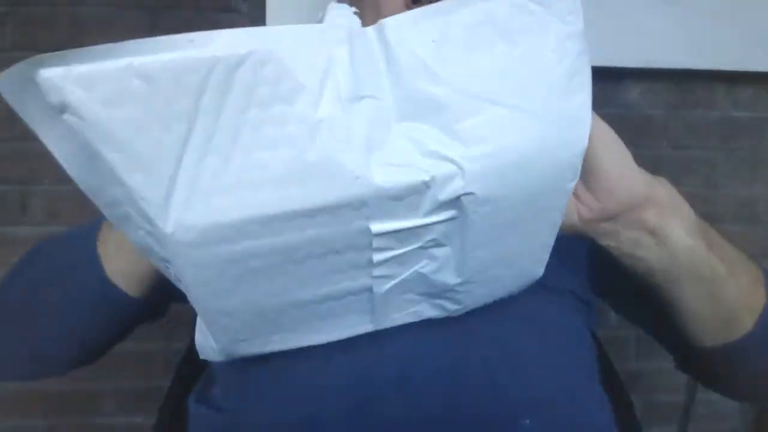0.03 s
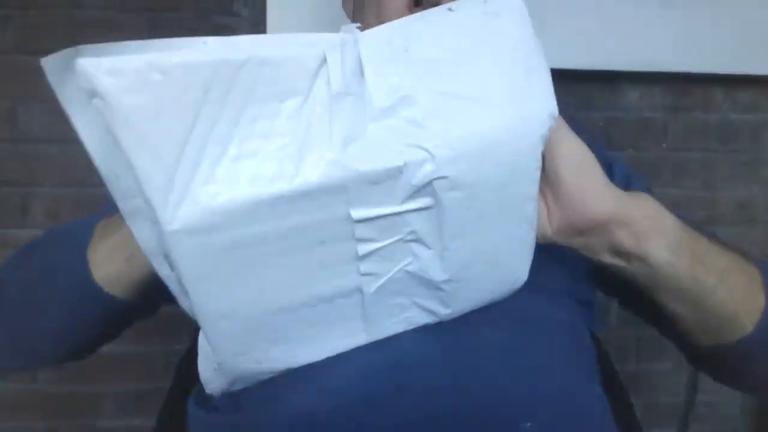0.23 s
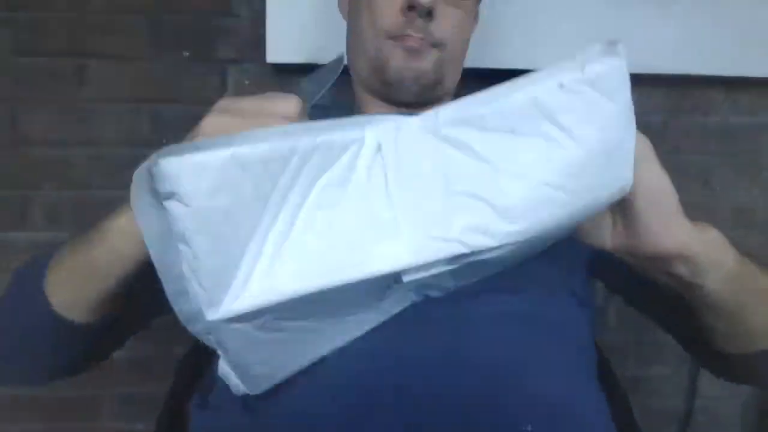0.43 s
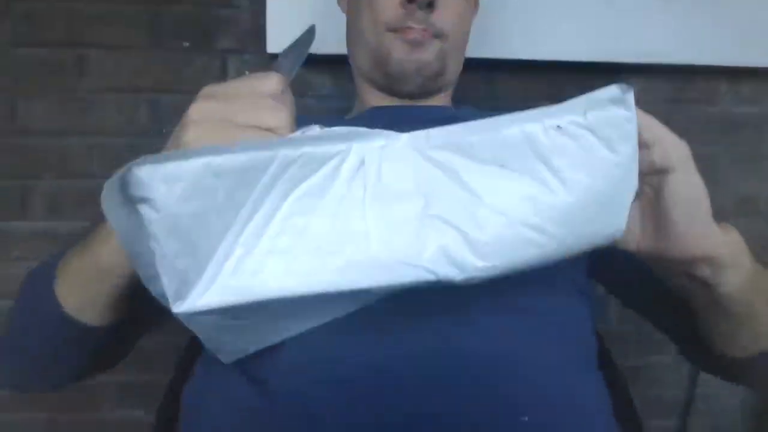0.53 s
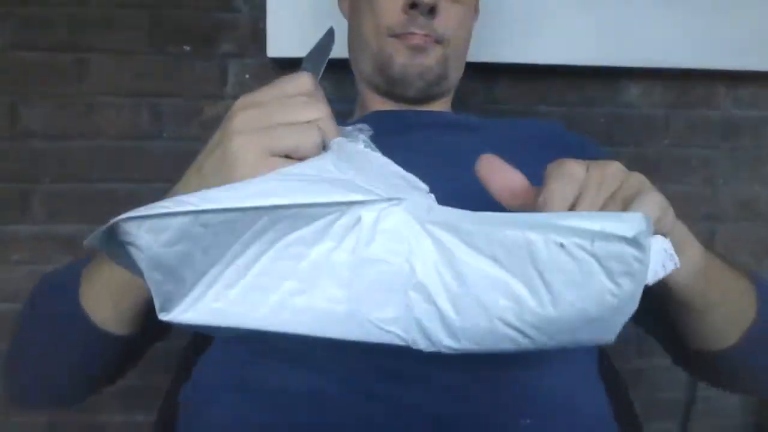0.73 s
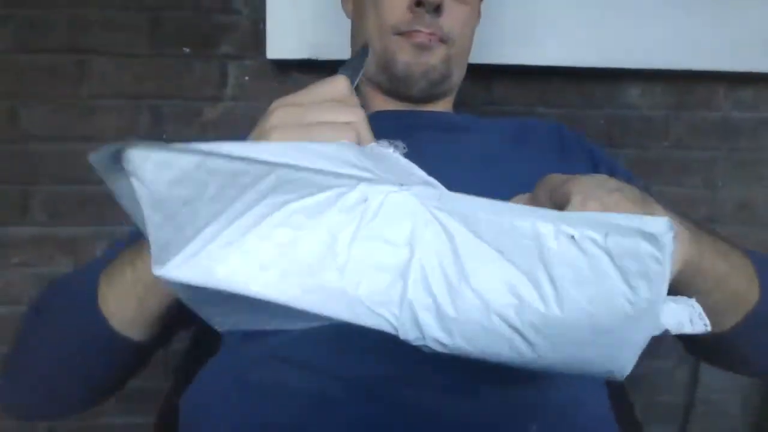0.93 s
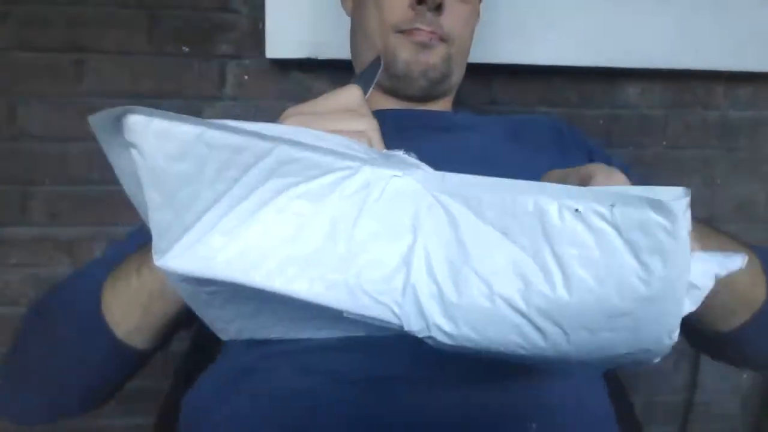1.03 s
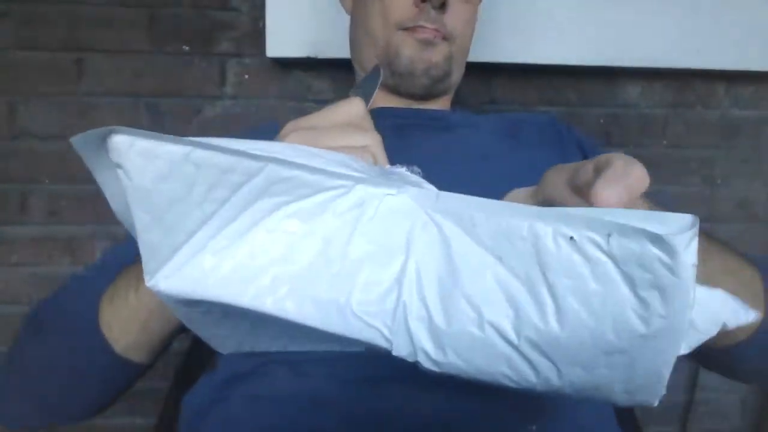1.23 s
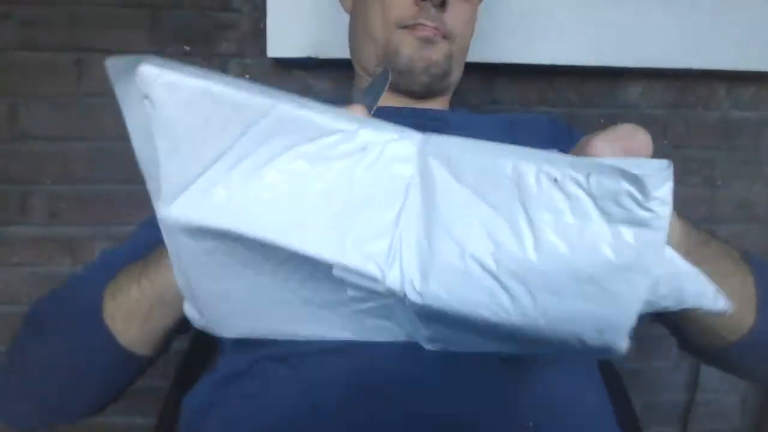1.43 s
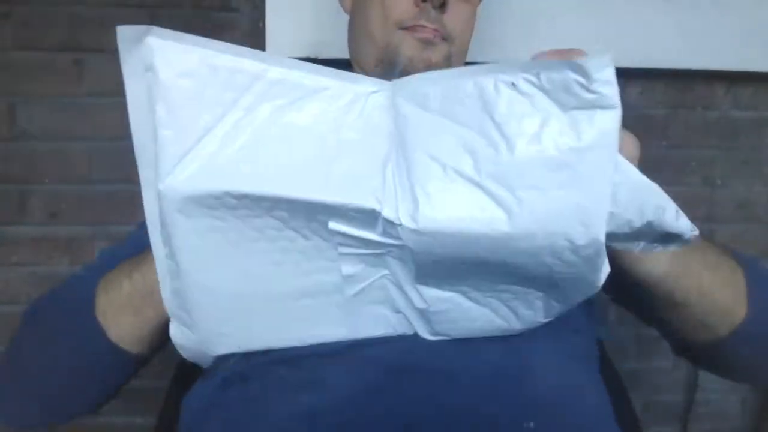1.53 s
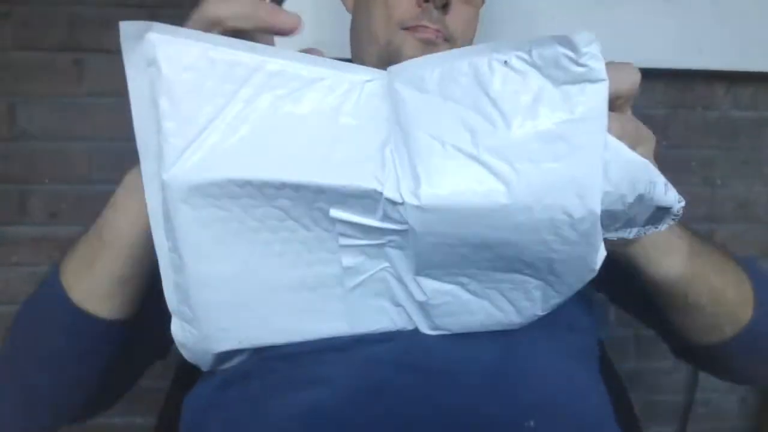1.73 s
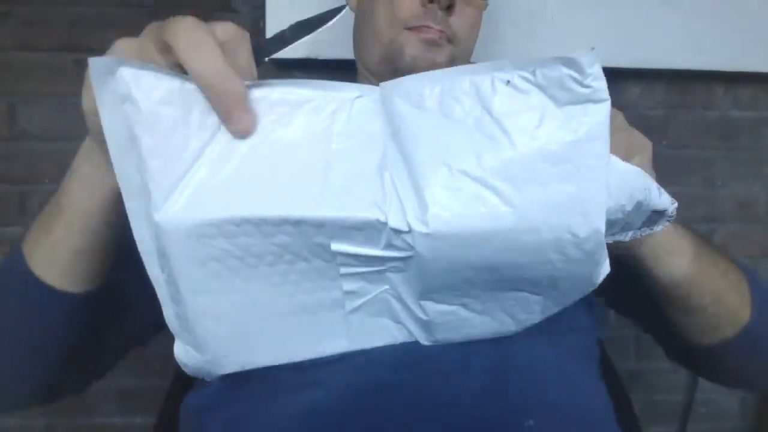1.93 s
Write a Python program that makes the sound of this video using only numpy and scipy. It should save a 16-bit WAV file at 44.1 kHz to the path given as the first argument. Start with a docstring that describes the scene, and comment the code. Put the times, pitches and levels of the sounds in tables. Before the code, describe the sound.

Stiff plastic packaging rustles and snaps as hands turn and tug it; a big early crunch, lighter crinkling, two further crunches, then almost silence and small squeaky slides, heard close and slightly dull indoors.

```python
"""Creases snap over a fine plastic crinkle: a padded mailer is gripped, turned and pulled at, close to a
narrow-band microphone in a small room. Three hard tugs crush many folds at once and the panels buckle
with hollow pops; the room hums briefly after each.
Crinkle, rustle and slides are shaped random clicks; snaps are noise bursts plus film rings; pops and
low hums are enveloped sines. A diffuse tail with room modes and faint air noise surround them."""
import sys
import numpy as np
from scipy import signal
from scipy.io import wavfile
from scipy.ndimage import uniform_filter1d

SR = 44100
rng = np.random.default_rng(int(sys.argv[2]) if len(sys.argv) > 2 else 0)


def digitize_waveform(pressure):
    """Quantize a signal to 16-bit integers and store it at the path in sys.argv[1].

    Rows of a 2-D input are taken as channels; values are limited to [-1, 1].
    """
    field = np.atleast_2d(pressure).T
    bounded = np.clip(field, -1, 1)
    quanta = np.round(bounded * 32767).astype(np.int16)
    wavfile.write(sys.argv[1], SR, quanta)


N = 88200


def amp(db):
    """Decibels to gain."""
    return 10 ** (np.asarray(db) / 20)


def unit(x):
    """Scales to rms 1."""
    return x / np.sqrt(np.mean(x ** 2) + 1e-20)


def read(points, hz):
    """Reads a spectrum on a log-frequency axis."""
    f, value = np.transpose(points)
    return np.interp(np.log(hz + 1), np.log(f + 1), value)


def level(table, order):
    """Gain over time from one dB column of a curve."""
    rows = np.array(table, float)
    return amp(np.interp(np.arange(N) / SR, rows[:, 0], rows[:, order]))


def add(mix, start_s, sound):
    """Mixes a sound in at a time."""
    part = mix[max(round(start_s * SR), 0):][:len(sound)]
    part += sound[:len(part)]


def arch(start_s, length_s, fullness):
    """Gain that swells and fades once; lower fullness is flatter on top."""
    u = np.clip((np.arange(N) / SR - start_s) / length_s, 0, 1)
    return (4 * u * (1 - u)) ** fullness


def colour(x, points):
    """Causal minimum-phase filter with the given spectrum."""
    hz = abs(np.fft.fftfreq(4096, 1 / SR))
    log_gain = np.log(amp(read(points, hz)))
    spectrum = np.exp(np.conj(signal.hilbert(log_gain)))
    taps = np.fft.ifft(spectrum).real
    return signal.fftconvolve(x, taps[:len(taps) // 2])[:len(x)]


def clicks(per_s, spread_db):
    """Random clicks of either sign, mostly small and a few large."""
    size = amp(spread_db * np.minimum(rng.exponential(1, N), 3.5))
    sign = rng.choice([-1., 1.], N)
    return size * sign * (rng.random(N) < per_s / SR)


def steadied(x, window_s):
    """Evens out slow chance swells and keeps the grain."""
    power = uniform_filter1d(x ** 2, max(int(window_s * SR), 8))
    power = uniform_filter1d(power, max(int(window_s * SR / 2), 8))
    return x / np.sqrt(abs(power) + 1e-3 * np.mean(x ** 2))


def peaked(x):
    """Scales a short burst so that its loudest 1.5 ms has rms 1."""
    power = uniform_filter1d(x ** 2, 66, mode="constant")
    return x / np.sqrt(power.max() + 1e-20)


def patchy(x, patch_db, frames=9, bins=7):
    """The colour shifts at random as the folding moves from one part of the sheet to another."""
    z = signal.stft(x, nperseg=512, noverlap=384)[2].T
    field = rng.standard_normal(z.shape)
    field = uniform_filter1d(uniform_filter1d(field, frames, 0), bins, 1)
    z = z * amp(patch_db * unit(field))
    return signal.istft(z.T, nperseg=512, noverlap=384)[1][:N]


# room noise spectrum: (frequency [Hz], relative level [dB])
AIR_SPECTRUM = [(20, -22), (70, -5), (200, 2), (290, -2), (450, -10.5), (1000, -18), (3000, -30.5),
                (7000, -41)]


def air(rms_db=-64):
    """Faint low room noise: coloured Gaussian noise."""
    return amp(rms_db) * unit(colour(rng.standard_normal(N), AIR_SPECTRUM))


# room hums as the mailer is shifted: (start [s], length [s], pitch [Hz], peak before waver [dB])
ROOM_HUMS = [(0.453, 0.16, 205, -51.5), (0.577, 0.13, 205, -53.5), (.85, 0.093, 205, -50),
             (0.96, 0.17, 207, -50), (1.57, 0.081, 200, -46.5), (1.825, 0.096, 272.6, -51.5)]


def hums(waver_rms=.35, waver_hz=25):
    """The room hums low as the mailer shifts: arched sines, unsteady in level and phase."""
    out = np.zeros(N)
    low_pass = signal.butter(2, waver_hz, fs=SR)
    drift = waver_rms * unit(signal.lfilter(*low_pass, rng.standard_normal((2, N))))
    for start_s, length_s, hz, db in ROOM_HUMS:
        first = max(round(start_s * SR), 0)
        swell, phase = drift[:, first:][:, :round(length_s * SR)]
        t = np.arange(len(swell)) / SR
        envelope = np.sin(np.pi * t / length_s) * (1 + swell)
        add(out, start_s, amp(db) * envelope * np.sin(2 * np.pi * hz * t + phase))
    return out


# finger slides: (start [s], length [s], start pitch [Hz], end pitch [Hz], level [dB])
FINGER_SLIDES = [(0.035, 0.078, 1000, 1020, -38.5), (0.44, 0.14, 1050, 950, -39),
                 (0.46, 0.0032, 4200, 4200, -26), (0.684, 0.031, 1900, 1820, -30.5),
                 (0.722, 0.018, 800, 760, -38), (0.763, 0.093, 1520, 1500, -41.5),
                 (1.215, 0.058, 1000, 1100, -34.5), (1.314, 0.063, 399, 554, -41.5),
                 (1.434, 0.034, 780, 430, -35.5), (1.722, 0.078, 4220, 4220, -60.5),
                 (1.894, 0.052, 1180, 1120, -41), (1.915, 0.096, 1020, 1060, -31.5)]


def slides(per_s=900, spread_db=2, even_s=0.023, pole_width_at_1k_hz=250, fullness=0.5):
    """Rubbed film sticks and slips, ringing one narrow note that glides as the film stretches."""
    out, slips = np.zeros(N), clicks(per_s, spread_db)
    for start_s, length_s, start_hz, end_hz, db in FINGER_SLIDES:
        hz = np.interp(np.arange(N) / SR, [start_s, start_s + length_s], [start_hz, end_hz])
        carrier = np.exp(2j * np.pi * np.cumsum(hz) / SR)
        width_hz = pole_width_at_1k_hz * np.sqrt(start_hz / 1000)
        pole = np.exp(-np.pi * width_hz / SR)
        # shift the note to 0 Hz, resonate, shift back
        note = (carrier * signal.lfilter([1], np.poly([pole, pole]), slips / carrier)).real
        out += amp(db) * arch(start_s, length_s, fullness) * steadied(note, even_s)
    return out


# hand thuds: (start [s], length [s], level [dB])
HAND_THUDS = [(0.109, 0.075, -54), (0.302, 0.034, -30.5), (0.364, 0.057, -34), (1.056, 0.023, -43),
              (1.178, 0.044, -51), (1.466, 0.047, -34)]
# thud spectrum: (frequency [Hz], relative level [dB])
THUD_SPECTRUM = [(25, -33.5), (70, -11.5), (130, 3), (200, 2), (350, -12.5), (900, -44.5)]


def thuds(per_s=900, spread_db=2, even_s=.03):
    """The hands press into the padding with a dull bump: arched, low-coloured clicks."""
    force = np.zeros(N)
    push = steadied(colour(clicks(per_s, spread_db), THUD_SPECTRUM), even_s)
    for start_s, length_s, db in HAND_THUDS:
        t = np.arange(0, length_s, 1 / SR)
        add(force, start_s, amp(db) * np.sin(np.pi * t / length_s))
    return force * push


# padding flex: (time [s], level before trim [dB])
FLEX_LEVEL = [(0, -77), (.10, -60.5), (.15, -74), (.20, -65.5), (.274, -39), (.299, -45), (.305, -10),
              (.314, -17.5), (.345, -22.5), (.40, -28.5), (.425, -39.5), (.44, -53.5), (.68, -63.5),
              (.715, -46.5), (.76, -66), (1.0, -64.5), (1.045, -49.5), (1.065, -21.5), (1.10, -36.5),
              (1.14, -48), (1.172, -69), (1.185, -36.5), (1.22, -32), (1.27, -57.5), (1.31, -49.5),
              (1.33, -39.5), (1.40, -63.5), (1.44, -67), (1.474, -34), (1.49, -18), (1.535, -40),
              (1.56, -59.5), (1.75, -75), (2, -67.5)]
# flex spectrum: (frequency [Hz], relative level [dB])
FLEX_SPECTRUM = [(30, -41), (70, -24.5), (130, -10.5), (250, -1), (450, 4.5), (650, 0), (1000, -3.5),
                 (2000, -45)]


def flex(per_s=700, spread_db=4, trim_db=-2, even_s=0.092):
    """The padding crumples with a dull rustle when it is tugged."""
    rustle = steadied(colour(clicks(per_s, spread_db), FLEX_SPECTRUM), even_s)
    return amp(trim_db) * level(FLEX_LEVEL, order=1) * rustle


# handling effort: (time [s], crinkle level before trim [dB], ringing-fold level before trim [dB])
EFFORT = [(0, -36, -35.5), (0.05, -40, -35.5), (0.085, -35, -31), (0.105, -49, -40.5),
          (0.135, -37.5, -42.5), (0.18, -31, -29.5), (0.235, -27, -24.5), (0.27, -26.5, -25),
          (0.298, -29.5, -25), (0.31, -29, -9.5), (0.34, -28.5, -19), (0.385, -20.5, -15.5),
          (0.415, -28.5, -28.5), (0.445, -38, -31.5), (0.495, -29.5, -30), (0.52, -43.5, -30.5),
          (0.55, -27, -30.5), (0.605, -41, -45), (0.64, -30, -28.5), (0.68, -37, -33), (0.71, -30.5, -25.5),
          (0.76, -44, -64), (0.825, -34, -35.5), (0.86, -50, -41.5), (0.905, -34.5, -35), (0.93, -55, -82),
          (0.985, -45.5, -81), (1.015, -28, -52), (1.042, -37.5, -35.5), (1.065, -30, -20.5),
          (1.095, -37.5, -42.5), (1.16, -37, -42), (1.215, -30.5, -22.5), (1.27, -36.5, -50),
          (1.33, -36.5, -39.5), (1.405, -34.5, -34), (1.45, -33.5, -30), (1.473, -38.5, -25),
          (1.49, -24, -20.5), (1.525, -35, -22), (1.56, -72, -60), (1.61, -39.5, -43), (1.63, -45, -33),
          (1.675, -56, -96), (1.71, -80.5, -101), (1.82, -54.5, -63.5), (1.88, -80, -81), (1.895, -41, -39),
          (1.918, -61, -48), (1.93, -54.5, -40), (1.975, -41, -30), (2.0, -46, -33)]
# crinkle spectrum: (frequency [Hz], relative level [dB])
CRINKLE_SPECTRUM = [(300, -49.5), (600, -36.5), (1200, -15.5), (1950, 3.5), (2500, 7.5), (3100, 4.5),
                    (4000, 6), (5100, -2.5), (6200, -3), (7500, -6)]


def crinkle(per_s=1600, pitched_per_s=70, spread_db=2.0, trim_db=-2, even_s=0.047, patch_db=3,
            pitch_count=12, decay_cycles=2):
    """Tiny folds give way in a dense, bright crackle: plain clicks plus short pitched rings."""
    t, pitched = np.arange(400) / SR, np.zeros(N)
    for hz in np.geomspace(1500, 6600, pitch_count):
        ring = np.sin(2 * np.pi * hz * t) * np.exp(-t * hz / decay_cycles)
        pitched += signal.oaconvolve(clicks(pitched_per_s, spread_db), ring)[:N] * hz
    grain = patchy(unit(clicks(per_s, spread_db)) + unit(pitched), patch_db)
    crackle = steadied(colour(grain, CRINKLE_SPECTRUM), even_s)
    return amp(trim_db) * level(EFFORT, order=1) * crackle


# fold spectrum: (frequency [Hz], relative level [dB])
FOLD_SPECTRUM = [(300, -36), (560, -32.5), (680, -6), (800, 3), (1000, 5.5), (1300, 3.5), (1700, 3.5),
                 (2200, 7.5), (3200, -21.5)]


def folds(per_s=1000, spread_db=3.0, low_hz=780, high_hz=1900, decay_cycles=1.6, trim_db=-4.0,
          even_s=0.019, pitch_count=14):
    """Larger folds each ring a patch of film: random clicks excite short damped sines."""
    t, out = np.arange(1000) / SR, np.zeros(N)
    for hz in np.geomspace(low_hz, high_hz, pitch_count):
        ring = np.sin(2 * np.pi * hz * t) * np.exp(-t * hz / decay_cycles)
        hits = clicks(per_s / pitch_count, spread_db)
        out += signal.oaconvolve(hits, ring)[:N] * np.sqrt(hz / low_hz)
    return amp(trim_db) * level(EFFORT, order=2) * steadied(colour(out, FOLD_SPECTRUM), even_s)


# tugs crushing many folds: (start [s], length [s], level [dB])
CRUSH_TUGS = [(0.304, 0.029, -22), (0.332, 0.093, -26), (1.046, 0.048, -26), (1.471, 0.065, -26)]
# crush spectrum: (frequency [Hz], relative level [dB])
CRUSH_SPECTRUM = [(300, -35), (600, -4), (1100, 5.5), (3900, 2.5), (5000, -10.5), (7500, -9.5)]


def crushes(per_s=5000, spread_db=3.0, even_s=0.011, fullness=0.53):
    """A hard tug packs many tiny crackles into one burst."""
    force = sum(amp(db) * arch(start_s, length_s, fullness) for start_s, length_s, db in CRUSH_TUGS)
    return force * steadied(colour(clicks(per_s, spread_db), CRUSH_SPECTRUM), even_s)


# crease snaps: (time [s], ring pitch [Hz], ring before trim and filter [dB], crack [dB], tick [dB])
CREASE_SNAPS = [(0.024, 990, -28.5, -34.5, -44), (0.032, 1000, -25.5, -27.5, -40),
                (0.0569, 995, -30.5, -28.5, -58), (0.0735, 990, -26, -36, -35),
                (0.0827, 1050, -25.5, -31.5, -46), (0.1475, 1970, -28.5, -31, -28.5),
                (0.178, 1616, -23.5, -46, -34), (0.1862, 1910, -18.5, -27, -22.5),
                (0.2019, 770, -24, -37, -30), (0.2245, 1190, -18.5, -20.5, -48),
                (0.235, 980, -27, -32, -41.5), (0.262, 1770, -12.5, -22, -38), (0.2752, 710, -16, -18, -20),
                (0.2879, 740, -14, -17.5, -30), (0.3057, 1036, -9.5, -17, -39),
                (0.3106, 720, -24, -19, -32.5), (0.3231, 1090, -18, -19.5, -39),
                (0.3281, 1830, -9.5, -10, -57), (0.3507, 1800, -9, -29, -44),
                (0.3622, 1200, -16.5, -22, -43.5), (0.3827, 1150, -14.5, -12.5, -37),
                (0.3965, 730, -28, -20.5, -22.5), (0.4619, 1210, -27, -24, -49),
                (0.4891, 1930, -17.5, -22, -27.5), (0.4987, 1000, -27.5, -18, -34),
                (0.504, 960, -25, -33, -39), (0.5277, 970, -29, -21.5, -24),
                (0.5405, 1840, -19.5, -26.5, -38), (0.5682, 1030, -30, -24.5, -22.5),
                (0.628, 1540, -21.5, -47.5, -47), (0.6444, 1030, -43, -32, -42.5),
                (0.6629, 915, -24, -24.5, -36), (0.7018, 1860, -14, -30.5, -41),
                (0.7103, 1580, -20, -37, -33), (0.744, 1200, -34, -34, -34.5),
                (0.8006, 1410, -39, -38, -47), (0.8234, 1570, -58, -24, -47), (0.8272, 1440, -25, -39, -39),
                (0.915, 960, -40.5, -33.5, -35.5), (0.9966, 1330, -57, -34.5, -31.5),
                (1.0111, 1400, -57, -26, -27), (1.0174, 1540, -26.5, -35.5, -38),
                (1.034, 1640, -42.5, -26, -27.5), (1.0521, 910, -18, -26.5, -34.5),
                (1.0664, 770, -21, -18, -33), (1.0706, 863, -12, -35, -19.5),
                (1.0877, 960, -37.5, -35, -29), (1.1077, 1340, -23.5, -39, -29.5),
                (1.1279, 1360, -27, -38.5, -43), (1.1796, 1150, -31, -26.5, -30.5),
                (1.2005, 1195, -25.5, -27.5, -33), (1.2109, 833, -20.5, -22.5, -27),
                (1.2216, 980, -19.5, -33.5, -32), (1.2349, 1090, -22, -29.5, -26.5),
                (1.2403, 1120, -29, -33, -38), (1.278, 1190, -30.5, -29, -30),
                (1.288, 1280, -54, -42.5, -22.5), (1.3044, 1463, -29, -26, -16.5),
                (1.322, 858, -16.5, -13.5, -20), (1.3307, 1395, -22, -29, -27),
                (1.3418, 1180, -19, -31, -22.5), (1.3677, 890, -27.5, -22, -25),
                (1.3801, 1100, -23.5, -26.5, -27), (1.3931, 1280, -27, -39.5, -31.5),
                (1.4182, 1067, -29, -27, -33), (1.4285, 833, -22, -20, -29),
                (1.4471, 772, -19.5, -21.5, -37), (1.4502, 1950, -18.5, -31, -24.5),
                (1.469, 1000, -26.5, -32, -30), (1.4812, 1110, -11.5, -26, -24.5),
                (1.4846, 1430, -20.5, -18, -19), (1.5015, 890, -18, -30, -27.5),
                (1.5134, 852, -13.5, -31, -26), (1.5207, 1344, -10.5, -18.5, -21.5),
                (1.5344, 934, -43.5, -23.5, -22.5), (1.553, 1044, -29.5, -30.5, -41),
                (1.583, 1540, -37, -35.5, -32.5), (1.6233, 1190, -27, -34, -30),
                (1.8909, 1083, -36, -47, -42), (1.9243, 853, -27, -56.5, -71),
                (1.9421, 1170, -24.5, -43, -72), (1.9562, 1045, -17.5, -31, -47),
                (1.9755, 1050, -22, -32.5, -54)]
# crack spectrum: (frequency [Hz], relative level [dB])
CRACK_SPECTRUM = [(300, -37.5), (600, -30), (1300, 4.5), (1900, 2.5), (3000, 4.5), (4100, 2.5),
                  (5200, -23.5), (8000, -34)]
# tick spectrum: (frequency [Hz], relative level [dB])
TICK_SPECTRUM = [(1000, -46.5), (3500, -8.5), (4700, 4), (6200, 4.5), (8000, -1)]
# film too light to radiate bass: (frequency [Hz], gain [dB])
RING_RADIATION = [(200, -34.5), (480, -22), (620, -6.5), (760, 1.5), (2200, -0.5), (4000, -17)]


def snaps(ring_s=0.0012, rise_s=0.00038, burst_s=.0022, scatter=0.26, ring_trim_db=-1.5):
    """A crease flips: one sharp click, a short burst of smaller ones, and a ring of the film."""
    t, out, rings = np.arange(1500) / SR, np.zeros(N), np.zeros(N)
    for time_s, hz, ring_db, crack_db, tick_db in CREASE_SNAPS:
        burst = scatter * rng.standard_normal((2, len(t))) * np.exp(-t / burst_s)
        crack, tick = (t == 0) + burst
        tone = np.sin(2 * np.pi * hz * t) * np.exp(-t / ring_s) * (1 - np.exp(-t / rise_s))
        add(rings, time_s - rise_s, amp(ring_db + ring_trim_db) * peaked(tone))
        add(out, time_s, amp(crack_db) * peaked(colour(crack, CRACK_SPECTRUM)))
        add(out, time_s, amp(tick_db) * peaked(colour(tick, TICK_SPECTRUM)))
    return out + colour(rings, RING_RADIATION)


# panel buckles: (time [s], pitch [Hz], level before envelope [dB], decay [s])
PANEL_BUCKLES = [(.2750, 408, -10, 0.0049), (0.2862, 518, -7, 0.0044), (.3030, 683, -21, 0.0027),
                 (0.308, 292, -9, 0.0058), (0.3121, 148, -23.5, 0.0093), (0.3282, 430, -12, 0.0019),
                 (0.362, 364, -10.5, 0.0036), (0.373, 256, -20, 0.011), (0.39, 127, -33, 0.004),
                 (.7110, 650, -36, 0.002), (1.0531, 278, -19, 0.0044), (1.068, 386, -9.5, 0.0032),
                 (1.071, 205, -21, 0.026), (1.084, 113, -21, 0.01), (1.1820, 205, -30, 0.019),
                 (1.3225, 360, -28.5, 0.006), (1.34, 434, -46, 0.0042), (1.4832, 203.6, -18.5, 0.015),
                 (1.488, 114.6, -16.5, 0.0068)]


def buckles(rise_s=0.0013):
    """A whole panel pops through with a low, quickly damped note."""
    t, out = np.arange(SR // 5) / SR, np.zeros(N)
    for time_s, hz, db, decay_s in PANEL_BUCKLES:
        envelope = np.exp(-t / decay_s) * (1 - np.exp(-t / rise_s))
        add(out, time_s, amp(db) * np.sin(2 * np.pi * hz * t) * envelope)
    return out


# diffuse tail decay: (frequency [Hz], T60 [s])
TAIL_T60 = [(100, 0.12), (300, 0.18), (1000, 0.15), (3000, 0.18), (7000, 0.18)]
# diffuse tail strength: (frequency [Hz], gain [dB])
TAIL_SPECTRUM = [(60, -11), (150, -1), (400, -5), (700, -7), (1100, -3.5), (7000, 1.5)]
# room modes: (frequency [Hz], T60 [s], gain at resonance [dB])
MODES = [(205, 0.1, -11), (278.5, 0.12, -2.5), (790, 0.27, -11), (956.5, 0.055, -14.5), (1160, 0.37, -9.5)]


def room(x, tail_db=-9, gap_s=.007, reflections_per_s=3000):
    """Sparse reflections decay by band in a diffuse tail; a few room modes ring on."""
    taps = rng.choice([-1., 1.], SR // 2) * (rng.random(SR // 2) < reflections_per_s / SR)
    hz, frame_s, z = signal.stft(taps, SR, nperseg=256)
    decay = amp(-60 * frame_s / read(TAIL_T60, hz)[:, None])
    tail = signal.istft(z * decay, SR, nperseg=256)[1]
    t = np.arange(len(tail)) / SR
    tail = tail * (t > gap_s)
    tail = amp(tail_db) * tail / np.linalg.norm(tail)  # level before colour
    tail = colour(tail, TAIL_SPECTRUM)
    for mode_hz, t60_s, db in MODES:
        fade = np.exp(-np.log(1000) * t / t60_s)
        tail = tail + amp(db) * 2 * fade / fade.sum() * np.cos(2 * np.pi * mode_hz * t)
    return signal.fftconvolve(x, tail)[:N]


def scene():
    """The mailer, its room and the background."""
    mailer = crinkle() + folds() + crushes() + flex() + thuds() + snaps() + buckles() + slides()
    return (mailer + room(mailer) + hums() + air())[None]


# microphone response: (frequency [Hz], gain [dB])
MIC_RESPONSE = [(20, -25), (45, -10.5), (80, 1), (500, 2), (1000, -0.5), (3000, -4.5), (6000, 1),
                (6550, 0.5), (7000, -12.5), (7500, -26), (8200, -31)]


def record(dry, ceiling=.9, edge_hz=8300):
    """The loudest peaks overload softly; then microphone colour and the band limit."""
    limited = dry[0] / (1 + (dry[0] / ceiling) ** 4) ** .25
    heard = colour(limited, MIC_RESPONSE)
    low_pass = signal.firwin(255, edge_hz, window=("kaiser", 8), fs=SR)
    return signal.oaconvolve(heard, low_pass, "same")[None]


dry = scene()
out = record(dry)
digitize_waveform(out)
```